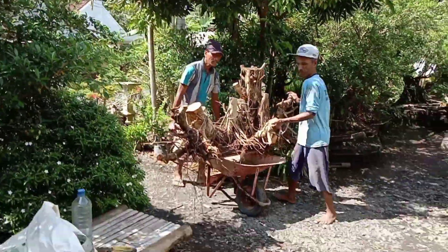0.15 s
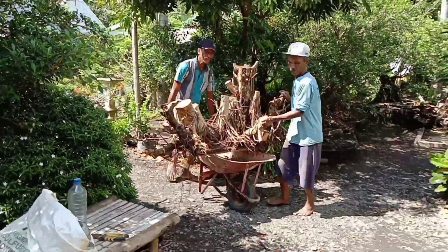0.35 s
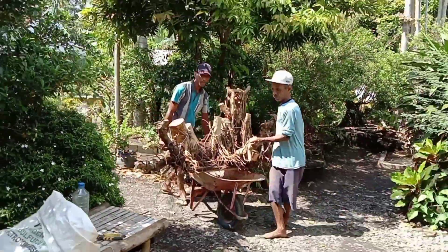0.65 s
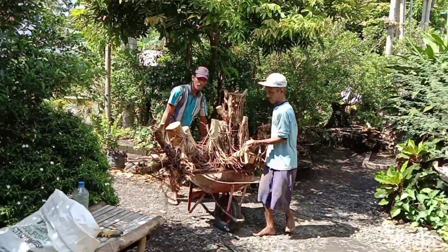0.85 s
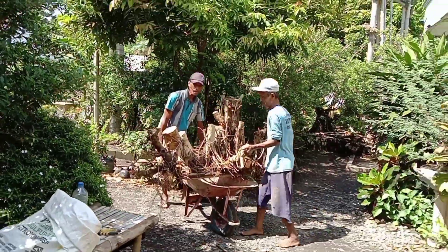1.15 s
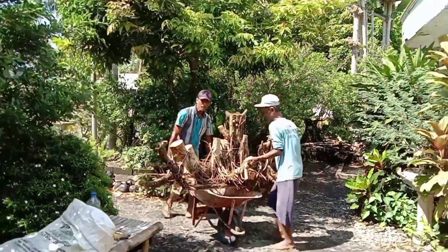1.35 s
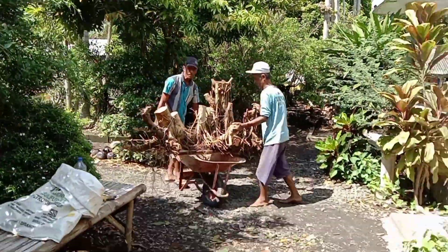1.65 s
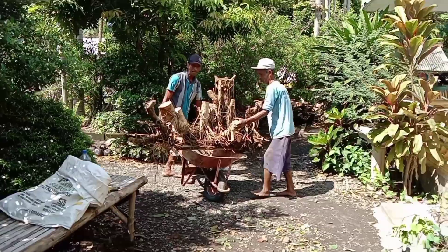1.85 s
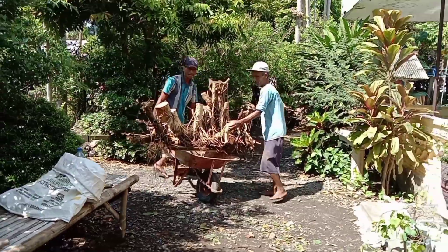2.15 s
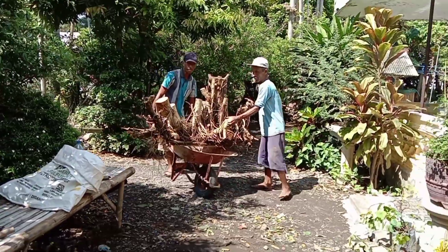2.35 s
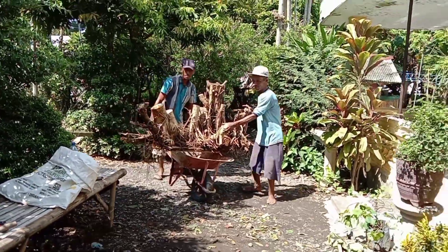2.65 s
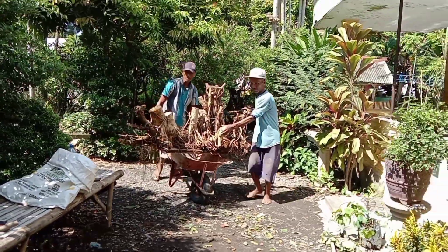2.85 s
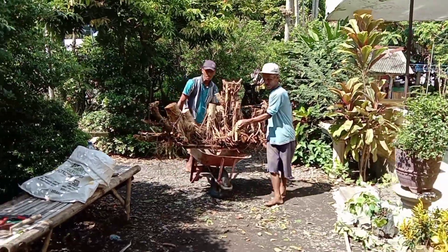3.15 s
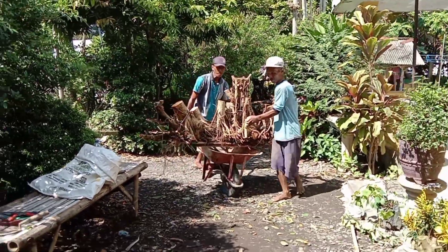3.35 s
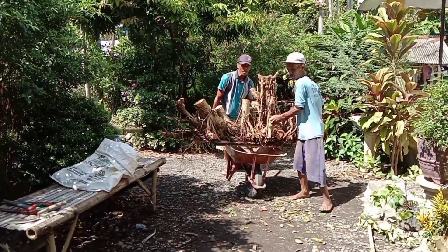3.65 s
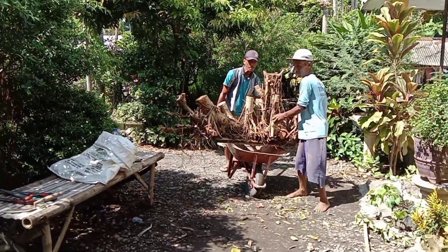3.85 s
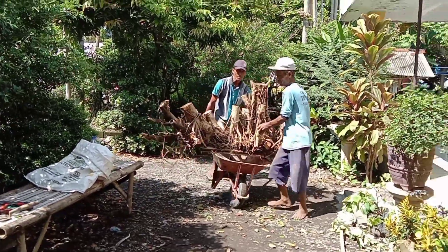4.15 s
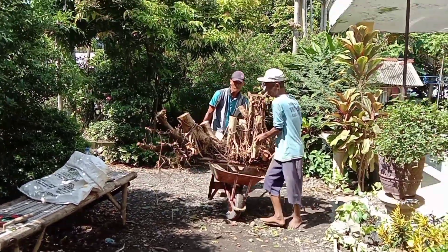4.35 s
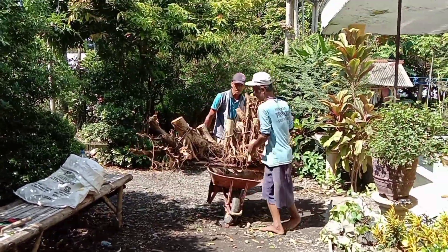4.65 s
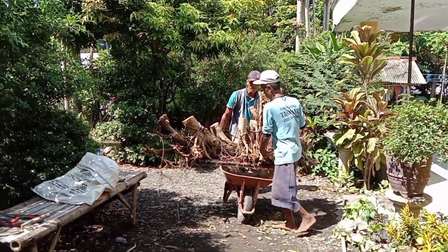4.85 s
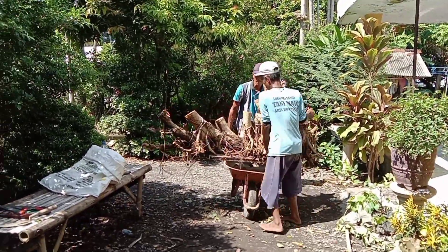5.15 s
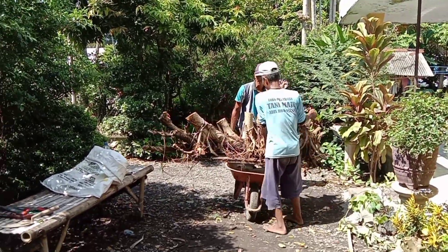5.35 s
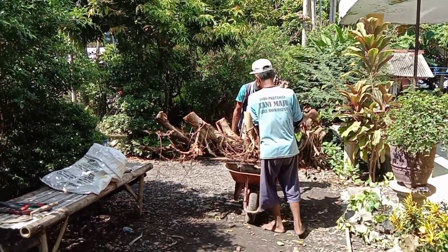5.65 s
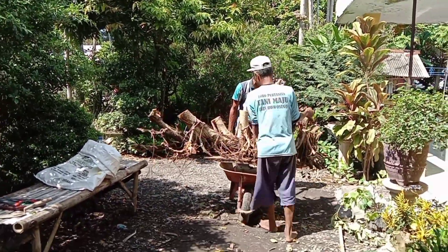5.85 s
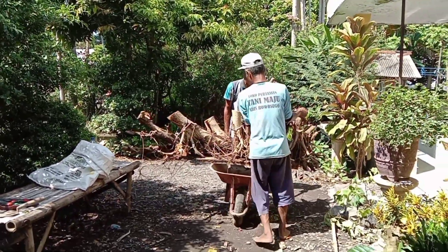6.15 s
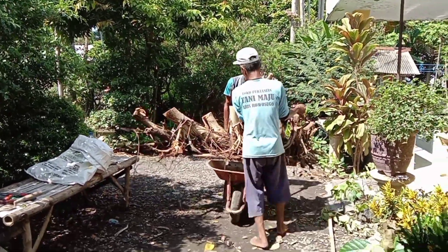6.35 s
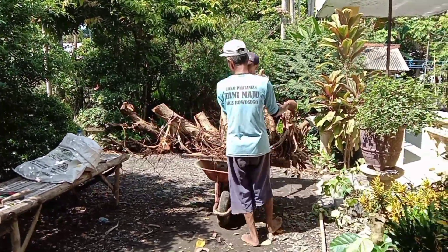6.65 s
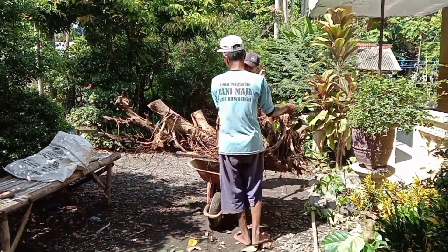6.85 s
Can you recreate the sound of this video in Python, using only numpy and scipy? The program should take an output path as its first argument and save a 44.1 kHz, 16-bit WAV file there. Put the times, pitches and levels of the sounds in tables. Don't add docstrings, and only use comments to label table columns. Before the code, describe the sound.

Steady low engine putter with a rough roar thins into the distance as a heavy wheelbarrow rattles across gravel, with small wind puffs.

```python
import sys
import numpy as np
from scipy import signal
from scipy.fft import rfft, irfft
from scipy.io import wavfile
from scipy.ndimage import uniform_filter1d

SR = 44100
rng = np.random.default_rng(int(sys.argv[2]) if len(sys.argv) > 2 else 0)


def pcm_store(signal):
    levels = np.round(np.clip(np.atleast_2d(signal), -1, 1) * 32767)
    wavfile.write(sys.argv[1], SR, levels.astype(np.int16).T)


def attenuation_scalar(level_db):
    decades = np.asarray(level_db, float) / 20
    return 10 ** decades


N = 309400

# (time [s], order 4 level [dB], order 5 level [dB], order 6 level [dB])
MIDDLE_ORDERS = [(0.0, -43, -55, -53), (0.06, -46, -51, -43), (0.12, -40.5, -39, -48),
                 (0.19, -41, -42, -59), (0.25, -39.5, -35.5, -55), (0.47, -36, -35.5, -35),
                 (0.64, -37.5, -27.5, -38), (1.21, -31, -30, -38), (1.48, -42, -30, -35.5),
                 (1.62, -31, -39.5, -30), (1.84, -56, -33, -31), (2.26, -72, -29.5, -31),
                 (2.36, -58, -31, -32), (2.46, -52, -29.5, -41.5), (2.58, -62, -33.5, -31.5),
                 (2.66, -46, -33, -42), (2.99, -58, -32.5, -39.5), (3.15, -41, -40.5, -37),
                 (3.22, -45.5, -50, -31.5), (3.42, -41.5, -46, -38.5), (3.52, -46.5, -51, -46.5),
                 (3.61, -48.5, -34.5, -48.5), (3.71, -46, -52, -43.5), (3.79, -48, -43, -44.5),
                 (3.85, -48, -41, -58), (3.95, -59, -42.5, -55), (4.06, -63, -36, -37.5),
                 (4.12, -53, -43, -50), (4.2, -51, -34, -39.5), (4.65, -55, -40.5, -48),
                 (4.71, -69, -37.5, -43), (4.86, -54, -39, -46), (4.96, -53, -36, -39),
                 (5.04, -52, -33, -43), (5.16, -60, -34, -42), (5.55, -60, -40, -47),
                 (5.72, -59, -40, -38.5), (5.82, -60, -39.5, -48.5), (5.96, -63, -37, -35),
                 (6.06, -59, -38.5, -47.5), (6.15, -57, -37.5, -35.5), (6.25, -60, -43, -55),
                 (6.56, -52, -41, -35), (6.74, -55, -38, -49), (6.88, -50, -36, -34),
                 (7.02, -66, -38.5, -43)]
# (time [s], rate [Hz], order 2 level [dB], order 3 level [dB], upper orders level [dB])
FIRING = [(0.0, 29.85, -47, -57, -54), (0.08, 29.48, -48, -60, -55), (0.35, 29.5, -50, -70, -47),
          (0.45, 29.5, -46, -55, -45), (0.8, 29.57, -43, -57, -45), (0.98, 28.93, -44, -52, -44),
          (1.04, 29.0, -45, -68, -45), (1.07, 29.26, -46, -51, -45), (1.15, 28.45, -46, -65, -45),
          (1.21, 28.97, -45, -58, -45), (1.82, 28.4, -50, -58, -42), (2.25, 28.08, -57, -62, -45),
          (2.34, 28.2, -52, -59, -47), (2.79, 28.28, -72, -63, -56), (2.99, 27.97, -66, -56, -51),
          (3.95, 28.0, -72, -74, -70), (4.22, 27.94, -75, -60, -63), (4.45, 28.0, -73, -71, -68),
          (4.67, 28.18, -69, -60, -73), (5.84, 28.4, -72, -64, -76), (6.0, 27.97, -78, -61, -71),
          (6.41, 28.4, -55, -46, -74), (6.82, 29.25, -71, -50, -70), (6.94, 28.5, -76, -43, -59),
          (7.02, 29.4, -59, -45, -56)]
# (order [-], level over their common level [dB])
UPPER_ORDERS = [(7, -3.5), (8, -5.5), (9, -7), (10, -4), (11, -0.4), (12, -6), (13, -13.5), (14, -15),
                (16, -13)]
# (time [s], roar level [dB], hiss level [dB], air level [dB])
NOISE_LEVELS = [(0.05, -40, -56.5, -71), (0.14, -43, -53, -73), (0.3, -40.5, -52, -67),
                (0.46, -38, -49.5, -63), (0.63, -38.5, -50, -63), (1.08, -39.5, -52, -66),
                (1.25, -40, -51, -64), (1.48, -40.5, -50.5, -68), (1.64, -41.5, -50, -67),
                (1.93, -41, -51, -66), (2.09, -42, -51, -64), (2.2, -46, -54, -80), (2.57, -46.5, -53, -71),
                (2.8, -50.5, -57.5, -79), (2.92, -60, -61, -84), (3.11, -58.5, -68, -82),
                (3.25, -50, -54.5, -66), (3.37, -65.5, -64.5, -71), (3.58, -59.5, -61.5, -73),
                (3.72, -64, -64, -77), (3.91, -60.5, -65, -90), (4.03, -60.5, -61.5, -84),
                (4.1, -61.5, -51.5, -79), (4.26, -65, -65, -83), (4.51, -66, -68, -79),
                (4.69, -69, -59, -73), (4.76, -71, -64.5, -67), (4.94, -70, -76, -83),
                (5.19, -68, -73, -91), (5.42, -69, -64, -82), (5.68, -71.5, -66.5, -83),
                (5.83, -69.5, -61.5, -75), (6.08, -65, -61.5, -76), (6.24, -72, -72.5, -88),
                (6.45, -70, -64.5, -68), (6.61, -70, -59.5, -75), (6.82, -59, -61.5, -71),
                (7.02, -63, -64.5, -80)]
# (frequency [Hz], density [dB per Hz])
ROAR_SPECTRUM = [(260, -26), (450, -4), (662, -6), (776, -3), (1350, 1), (1480, -2), (2570, -11),
                 (3900, -11.5), (4800, -36), (6240, -56), (10600, -120)]
# (frequency [Hz], density [dB per Hz])
HISS_SPECTRUM = [(1350, -31), (2300, -6.5), (2610, -7.5), (3450, -12.5), (3940, -0.5), (5020, -9.5),
                 (5520, -4), (7730, -4.5), (8610, -6), (9400, -28), (11500, -25.5), (15000, -52),
                 (22000, -120)]
# (frequency [Hz], density [dB per Hz])
AIR_SPECTRUM = [(9000, -14.5), (11300, -18.5), (12300, -8), (15300, -3.5), (15800, -38)]
# (frequency [Hz], density [dB per Hz])
RUMBLE_SPECTRUM = [(8.2, -51.5), (14, -25), (76, -11), (118, 0), (155, 5), (192, 2.5), (226, -4.5),
                   (320, -8), (520, -36), (680, -65), (1140, -120)]
# (time [s], level [dB], bottom edge [Hz], top edge [Hz])
GUST_CURVES = [
    [(0.03, -43, 180, 600), (0.052, -42, 180, 600), (0.088, -34.5, 180, 604), (0.17, -58, 180, 600)],
    [(4.14, -61, 180, 598), (4.144, -69, 178.5, 590), (4.178, -40, 177, 605), (4.308, -52.5, 176.8, 587),
     (4.326, -41, 182, 575), (4.432, -80, 180, 597), (4.45, -60, 180, 600)],
    [(5.43, -79, 310, 680), (5.444, -43, 310, 684), (5.458, -43, 306, 680), (5.496, -44, 307, 670),
     (5.646, -83, 310, 676), (5.66, -67, 310, 680)],
    [(6.08, -58, 231, 720), (6.112, -43.5, 224, 720), (6.148, -39.5, 229, 690), (6.284, -61.5, 223, 690),
     (6.32, -81, 230, 733)],
    [(6.74, -61, 226, 700), (6.836, -40.5, 220, 710), (6.864, -42, 228, 720), (6.888, -36, 225, 720),
     (6.91, -42, 227, 710), (6.924, -35.5, 224, 720), (7.016, -58, 230, 717)],
]
# (time [s], peak level [dB], centre [Hz], spread [octaves], hold [s], decay time t60 [s])
LOAD_KNOCKS = [(0.079, -28.5, 703, 0.54, 0.039, 0.14), (0.579, -25.5, 1420, 0.54, 0.023, 0.11),
               (0.612, -25.5, 1430, 0.37, 0.028, 0.15), (0.665, -26.5, 1530, 0.54, 0.04, 0.15),
               (0.919, -26, 1370, 0.54, 0.03, 0.12), (1.518, -24, 1450, 0.44, 0.024, 0.097),
               (2.055, -22.5, 1000, 0.54, 0.024, 0.14), (2.403, -30, 1340, 0.41, 0.056, 0.13),
               (2.62, -33.5, 1495, 0.37, 0.09, 0.17), (2.708, -29, 1210, 0.35, 0.016, 0.14),
               (2.871, -37.5, 1309, 0.4, 0.039, 0.12), (2.921, -32.5, 1260, 0.26, 0.021, 0.1),
               (3.212, -31, 1328, 0.43, 0.02, 0.14), (3.326, -43, 1230, 0.3, 0.05, 0.14),
               (3.531, -41, 1229, 0.31, 0.04, 0.12), (3.609, -38, 1180, 0.41, 0.04, 0.12),
               (3.874, -39, 1425, 0.4, 0.029, 0.12), (4.114, -36.5, 947, 0.52, 0.032, 0.14),
               (4.506, -35.5, 950, 0.37, 0.023, 0.1), (4.633, -41, 1580, 0.47, 0.013, 0.083),
               (4.815, -37, 1390, 0.4, 0.013, 0.18), (5.675, -46.5, 945, 0.54, 0.064, 0.15),
               (5.993, -32, 660, 0.3, 0.049, 0.23), (4.0721, -40.5, 1940, 0.6, 0.042, 0.13),
               (4.4533, -36, 1310, 0.41, 0.029, 0.13), (5.4575, -47, 1260, 0.6, 0.035, 0.12),
               (5.9229, -36, 1782, 0.66, 0.048, 0.13), (5.9873, -33, 1760, 0.72, 0.052, 0.11),
               (6.8134, -45, 1384, 0.77, 0.043, 0.13), (6.9032, -33, 1150, 0.58, 0.033, 0.14)]
# (time [s], peak level [dB], hold [s], air over the peak [dB])
GRIT_SPRAYS = [(0.261, -33.5, 0.027, -18), (0.722, -31, 0.051, -14), (0.9126, -33, 0.019, -24),
               (1.0735, -33.5, 0.042, -25), (2.059, -36.5, 0.021, -16), (2.41, -44, 0.03, -7),
               (3.07, -43.5, 0.056, -18), (3.1715, -38, 0.056, -15), (3.8493, -39.5, 0.033, -35),
               (3.949, -42, 0.046, -22), (4.072, -37.5, 0.011, -5), (4.092, -42, 0.014, -10),
               (4.174, -45, 0.057, -35), (4.6296, -48, 0.016, -11), (4.851, -47.5, 0.03, -10),
               (5.262, -45.5, 0.057, -20), (5.646, -43, 0.044, -14), (5.9255, -41, 0.073, -16),
               (5.987, -37.5, 0.02, -18), (6.17, -42, 0.014, -28), (6.211, -44, 0.038, -16),
               (6.525, -48, 0.031, -18), (6.657, -44, 0.015, -19), (6.892, -42.5, 0.021, -18)]
# (time [s], peak level [dB], centre [Hz], spread [octaves], hold [s], decay time t60 [s])
STONE_CLICKS = [(0.722, -33, 3670, 0.4, 0.048, 0.1), (2.051, -30.5, 2860, 0.42, 0.029, 0.071),
                (2.41, -32.5, 4130, 0.38, 0.045, 0.12), (2.548, -33, 3240, 0.3, 0.03, 0.12),
                (2.7775, -38.5, 3010, 0.25, 0.024, 0.1), (3.1695, -40.5, 3830, 0.42, 0.064, 0.13),
                (3.6057, -48.5, 3132, 0.18, 0.02, 0.1), (3.9504, -36, 3460, 0.42, 0.039, 0.11),
                (4.1623, -45, 3770, 0.42, 0.03, 0.12), (4.729, -47.5, 2770, 0.3, 0.015, 0.083),
                (4.8545, -42, 3900, 0.25, 0.01, 0.14), (5.266, -47.5, 4100, 0.42, 0.037, 0.12),
                (5.654, -44.5, 3680, 0.3, 0.039, 0.1), (5.917, -43, 2760, 0.42, 0.04, 0.14),
                (5.988, -35, 3600, 0.42, 0.027, 0.14), (6.168, -44.5, 4620, 0.4, 0.022, 0.12),
                (6.6536, -39, 3530, 0.36, 0.018, 0.1), (6.752, -47, 3420, 0.26, 0.03, 0.1)]
# (time [s], frequency [Hz], level [dB])
TRAY_HUM = [(2.8, 1400, -56.5), (3.09, 1381, -69), (3.22, 1450, -48), (3.34, 1400, -73), (4.14, 1460, -55),
            (4.43, 1450, -72), (4.45, 1430, -51), (4.62, 1476, -74), (4.63, 1490, -48), (4.77, 1440, -105),
            (4.82, 1450, -41), (4.89, 1450, -66), (5.29, 1457, -77.5), (5.7, 1510, -68), (5.85, 1640, -83),
            (5.93, 1600, -53), (6.37, 1560, -87), (6.56, 1640, -68), (6.93, 1460, -61), (7.02, 1480, -68)]


def table(rows, t):
    seconds, *columns = np.transpose(rows)
    return [np.interp(t, seconds, column) for column in columns]


def evened(x):
    return x / np.sqrt(np.mean(x ** 2) + 1e-20)


def read(points, hz):
    f, value = np.transpose(points)
    return np.interp(np.log(hz + 1), np.log(f + 1), value)


def add(mix, s, sound):
    part = mix[round(s * SR):][:len(sound)]
    part += sound[:len(part)]


def drift(top_hz, count):
    coarse = rng.standard_normal((count, N // 64 + 2))
    lowpass = signal.butter(2, top_hz, fs=SR / 64, output="sos")
    coarse = signal.sosfiltfilt(lowpass, coarse)
    return [np.interp(np.arange(N) / 64, np.arange(len(c)), evened(c)) for c in coarse]


def coloured(x, gain):
    return irfft(rfft(x) * gain(np.fft.rfftfreq(len(x), 1 / SR)), len(x))


def patchy(shape, depth_db, flicker_db):
    frames = N // 128 + 5
    real, imaginary, patches = rng.standard_normal((frames, 257, 3)).T
    flicker = evened(uniform_filter1d(patches[0], size=5))
    patches = uniform_filter1d(patches, size=2, axis=0)
    patches = evened(uniform_filter1d(patches, size=34, axis=1))
    depth_db = np.pad(depth_db[::128], (0, frames), "edge")[:frames]
    streaks_db = depth_db * patches - 0.065 * depth_db ** 2 + flicker_db * flicker
    z = (real + 1j * imaginary) * attenuation_scalar(streaks_db)
    noise = signal.istft(z, nperseg=512, noverlap=384)[1][:N]
    return evened(coloured(noise, lambda f: attenuation_scalar(read(shape, f))))


def engine():
    t = np.arange(N) / SR
    hz, second_db, third_db, upper_db = table(FIRING, t)
    roar_db, hiss_db, air_db = table(NOISE_LEVELS, t)
    uneven, fading = drift(22.6, count=14), drift(2.36, count=15)
    turns = np.cumsum(hz) / SR + 0.31 + 0.006 * fading[-1]
    orders = list(zip(range(2, 7), [second_db, third_db] + table(MIDDLE_ORDERS, t)))
    orders += [(order, db + upper_db) for order, db in UPPER_ORDERS]

    rumble = coloured(rng.standard_normal(N), lambda f: attenuation_scalar(read(RUMBLE_SPECTRUM, f)))
    out = attenuation_scalar(upper_db + 5.5) * evened(rumble)
    for (order, db), waver, fade in zip(orders, uneven, fading):
        upper = order > 6
        fade_db = 3.3 * fade * upper
        phase = 2 * np.pi * order * turns + 0.51 * waver * upper
        out += attenuation_scalar(db + fade_db + 1.52 * waver) * np.sqrt(2) * np.cos(phase)

    far = np.clip((-38 - roar_db) / 14, 0, 1)
    out += attenuation_scalar(roar_db + 2.2) * patchy(ROAR_SPECTRUM, 1.8 + 3.5 * far, flicker_db=0.6)
    out += attenuation_scalar(hiss_db + 0.3) * patchy(HISS_SPECTRUM, 2.2 + 2.4 * far, flicker_db=0.8)
    return out + attenuation_scalar(air_db + 3.0) * patchy(AIR_SPECTRUM, 1.8 + 0.8 * far, flicker_db=4.5)


def gust(rows):
    t = np.arange(rows[0][0], rows[-1][0], 1 / SR)
    level_db, bottom_hz, top_hz = table(rows, t)
    strikes = rng.random(len(t)) < 700 / SR
    kicks = rng.standard_normal(len(t)) * (strikes + 0.05)
    out = 0
    for hz in np.geomspace(150, 900, num=9):
        bandpass = signal.butter(4, [hz / 1.18, hz * 1.182], "band", fs=SR, output="sos")
        band = signal.sosfilt(bandpass, kicks)
        edges = (1 + (hz / top_hz) ** 15.5) * (1 + (bottom_hz / hz) ** 6.3)
        out = out + band * attenuation_scalar(-4.5 * np.log2(hz / 300)) / edges
    return rows[0][0], attenuation_scalar(level_db + 1.35) * evened(out) * signal.windows.tukey(len(t), 0.25)


def stroke(hold, t60):
    t = np.arange(8192) / SR
    rattle = attenuation_scalar(-60 * np.maximum(t - hold, 0) / t60 - 115 * t)
    onset = np.minimum(t / 0.0012, 1)
    tick = 1 + 0.7 * np.exp(-t / 0.0033)
    ending = np.minimum((t[-1] - t) / 0.03, 1)
    return onset * tick * rattle * ending


def contacts(shape):
    jumps = np.repeat(rng.standard_normal(128), 64)
    return rng.standard_normal(shape) * attenuation_scalar(shape_db(shape) * jumps)


def shape_db(shape):
    return 2.14 if shape == 8192 else 2.4


def knock(s, peak_db, hz, octaves, hold, t60):
    lumps_db = 4.5 * rng.standard_normal(120)

    def colour(f):
        bell = np.exp(-0.5 * (np.log2((f + 1) / hz) / octaves) ** 2)
        return bell * attenuation_scalar(np.interp(f, np.arange(120) * 110, lumps_db))

    shake = contacts(8192)
    return s - 0.001, attenuation_scalar(peak_db - 10.5) * stroke(hold, t60) * evened(coloured(shake, colour))


def grit(s, peak_db, hold, air_db):
    low, high = contacts((2, 8192))
    low = coloured(low, lambda f: attenuation_scalar(read(HISS_SPECTRUM, f)) / (1 + (5200 / (f + 1)) ** 14))
    high = coloured(high, lambda f: attenuation_scalar(read(AIR_SPECTRUM, f)))
    spray = evened(low) + attenuation_scalar(air_db + 10.5) * evened(high)
    return s - 0.001, attenuation_scalar(peak_db - 12.5) * stroke(hold, 0.15) * spray


def hum():
    t = np.arange(N) / SR
    hz, level_db = table(TRAY_HUM, t)
    lowpass = signal.butter(2, 45, fs=SR, output="sos")
    fuzz = signal.sosfilt(lowpass, rng.standard_normal((2, N)))
    turn = np.exp(2j * np.pi * np.cumsum(hz) / SR)
    whistle = (turn * (fuzz[0] + 1j * fuzz[1])).real
    return attenuation_scalar(level_db - 0.5) * evened(whistle) * (t > TRAY_HUM[0][0])


def scene():
    mix = engine()
    for rows in GUST_CURVES:
        add(mix, *gust(rows))
    for row in LOAD_KNOCKS + STONE_CLICKS:
        add(mix, *knock(*row))
    for row in GRIT_SPRAYS:
        add(mix, *grit(*row))
    mix += hum()
    return mix[None]


def top_cut(x):
    return signal.sosfilt(signal.butter(12, 16410, fs=SR, output="sos"), x)


def record(dry):
    x = signal.sosfilt(signal.butter(1, 12, "high", fs=SR, output="sos"), dry)
    fade_in = np.clip(np.arange(N) / SR / 0.065 + 0.17, 0, 1)
    return top_cut(x * fade_in)


dry = scene()
out = record(dry)
pcm_store(out)
```